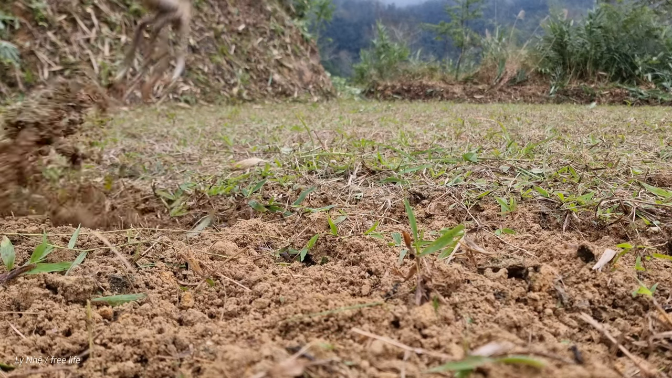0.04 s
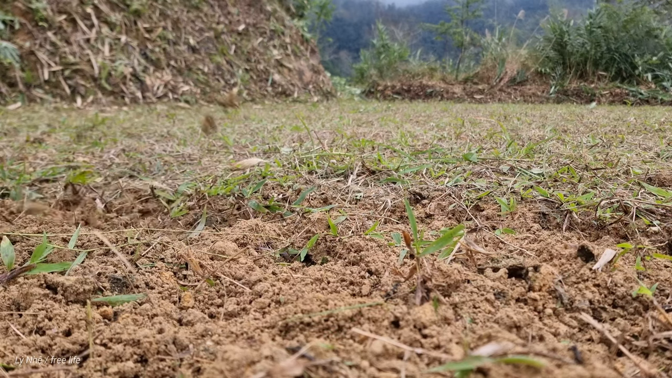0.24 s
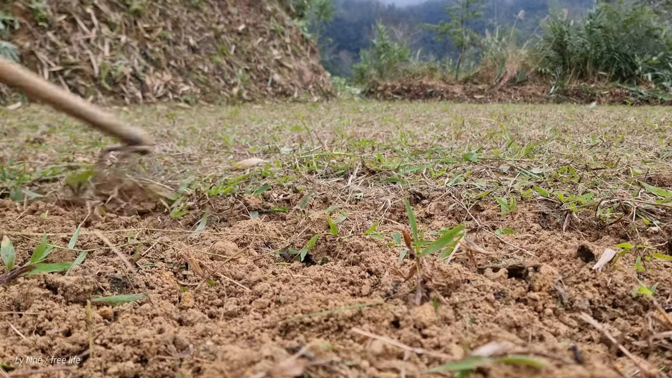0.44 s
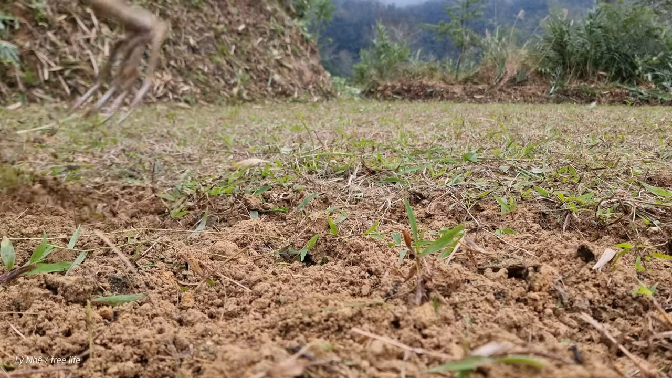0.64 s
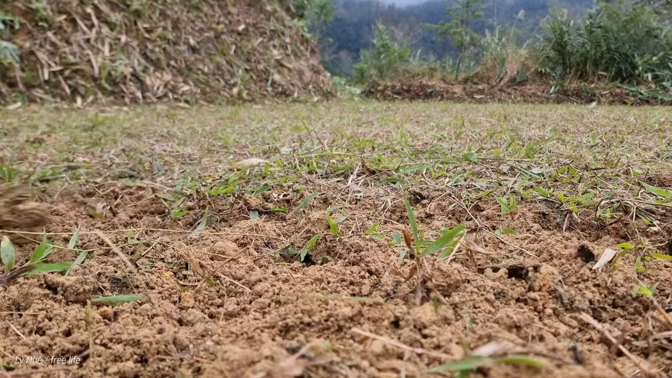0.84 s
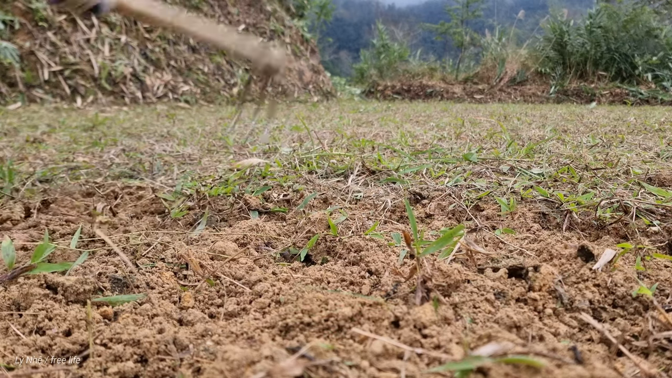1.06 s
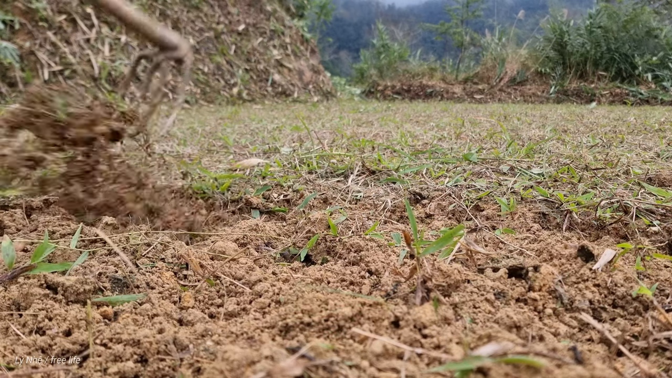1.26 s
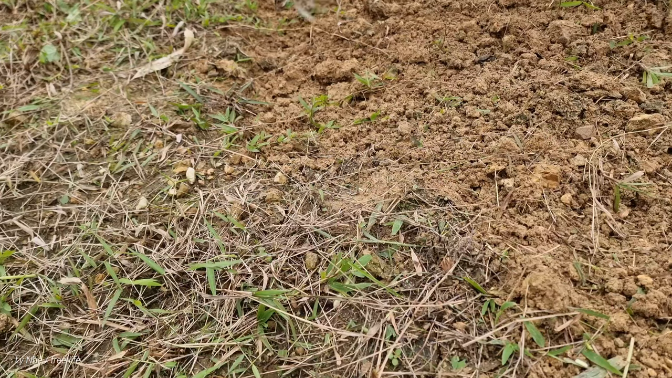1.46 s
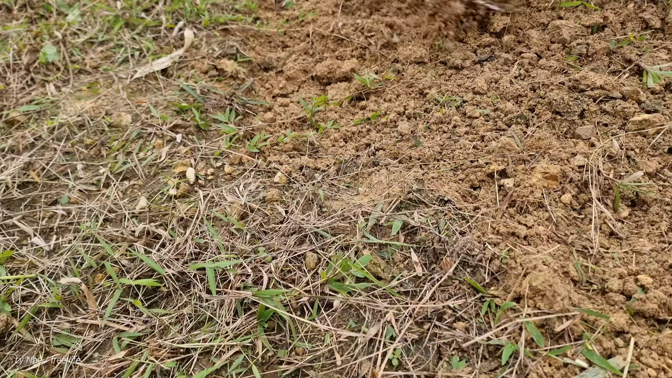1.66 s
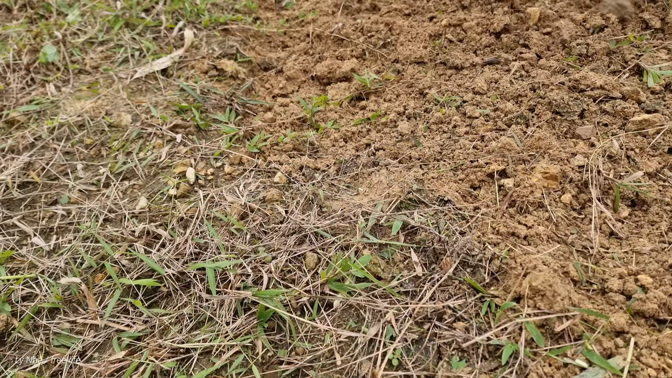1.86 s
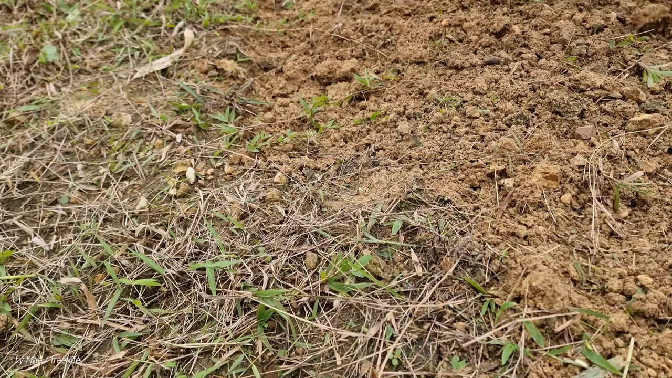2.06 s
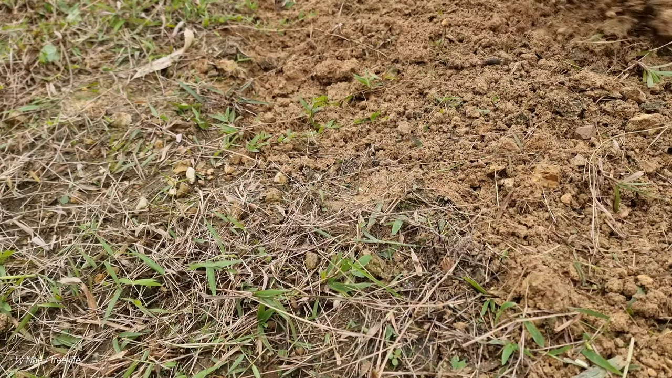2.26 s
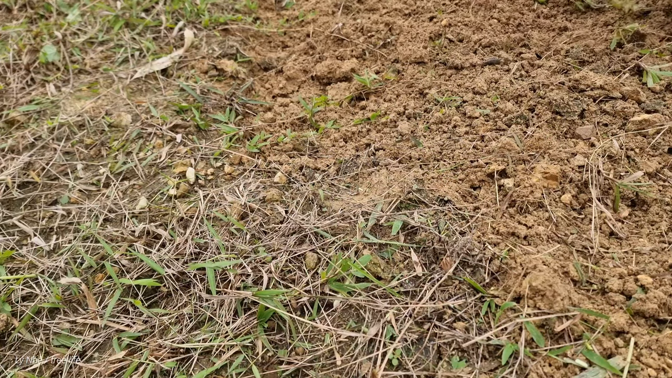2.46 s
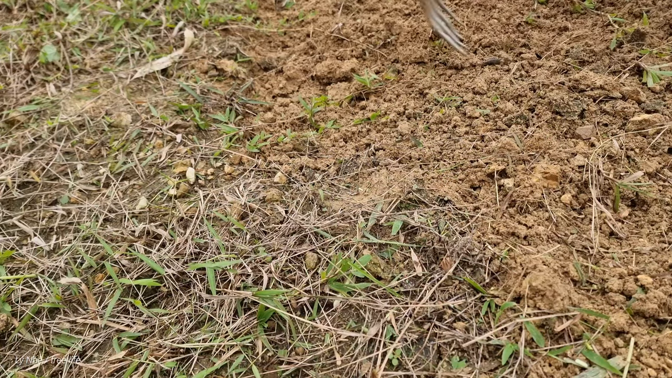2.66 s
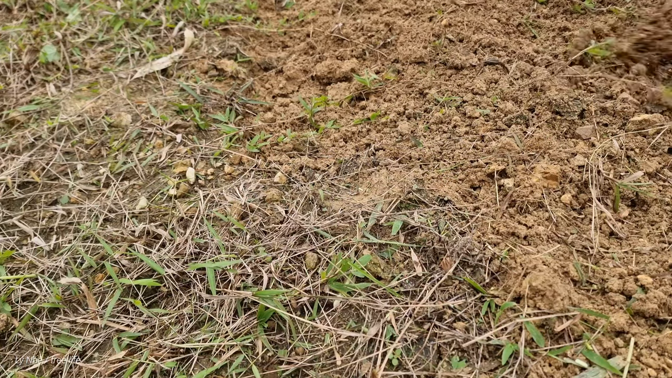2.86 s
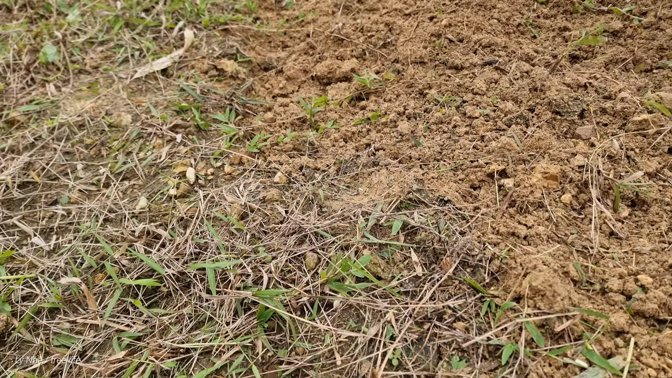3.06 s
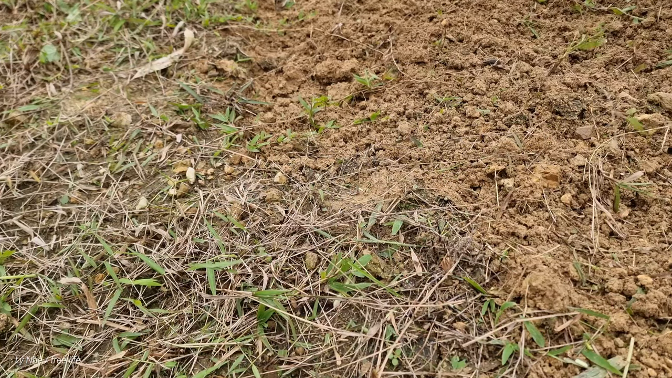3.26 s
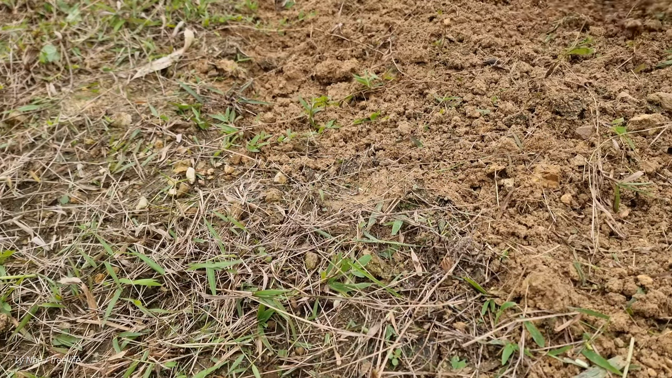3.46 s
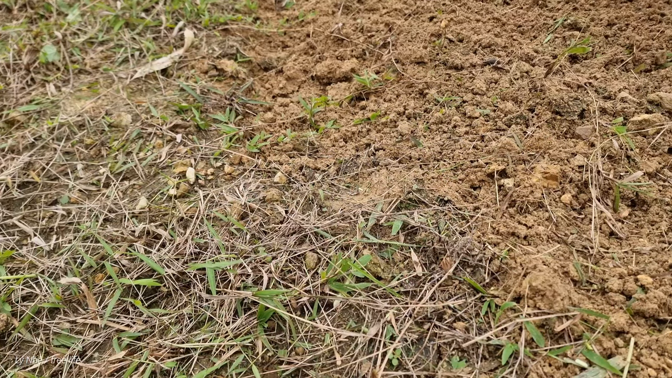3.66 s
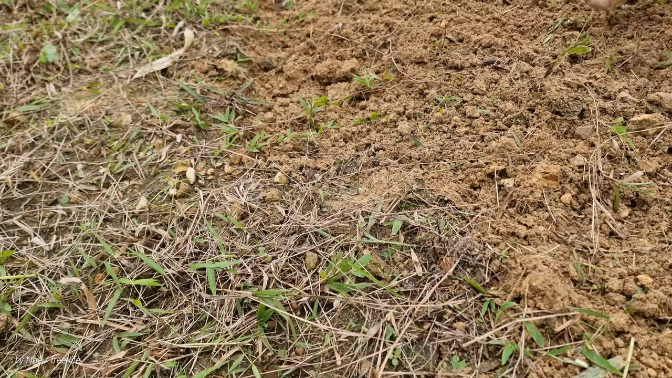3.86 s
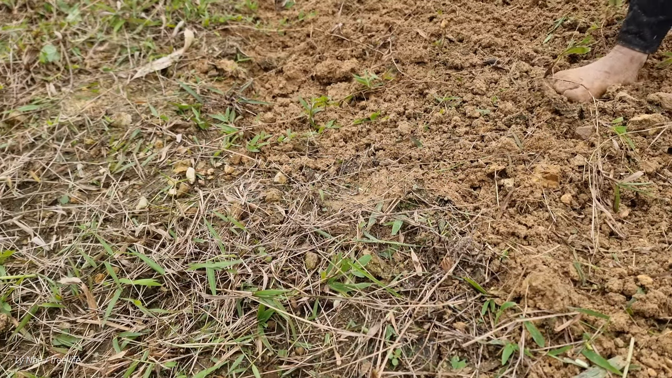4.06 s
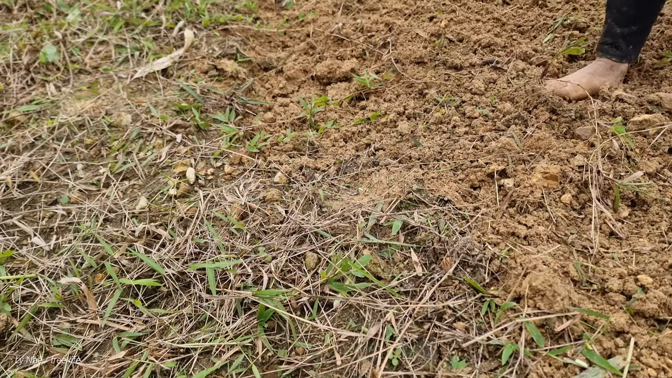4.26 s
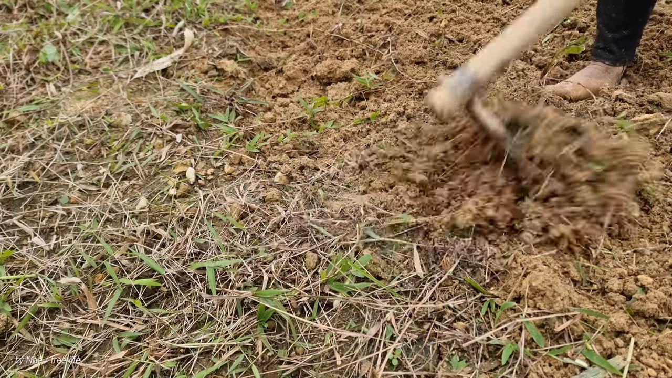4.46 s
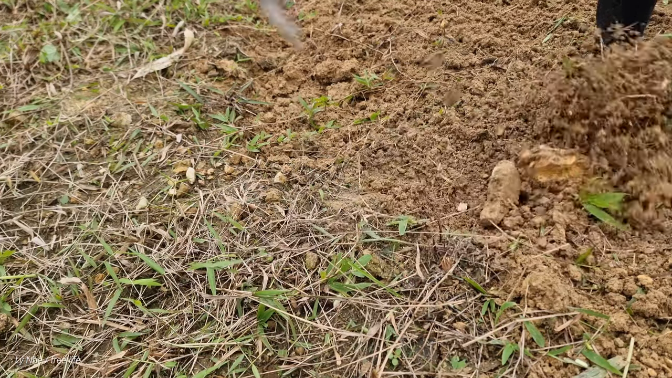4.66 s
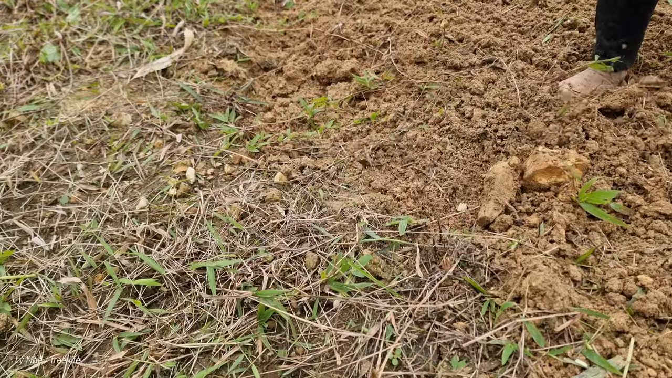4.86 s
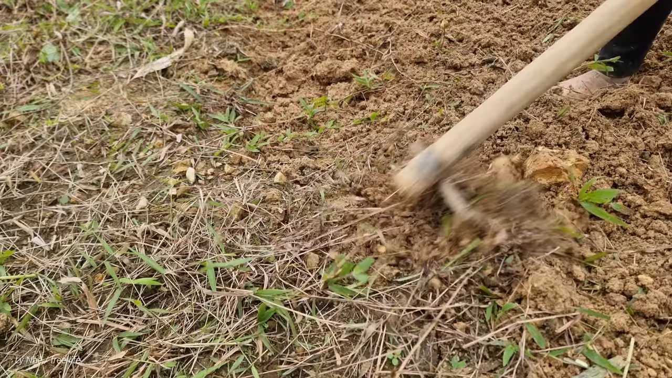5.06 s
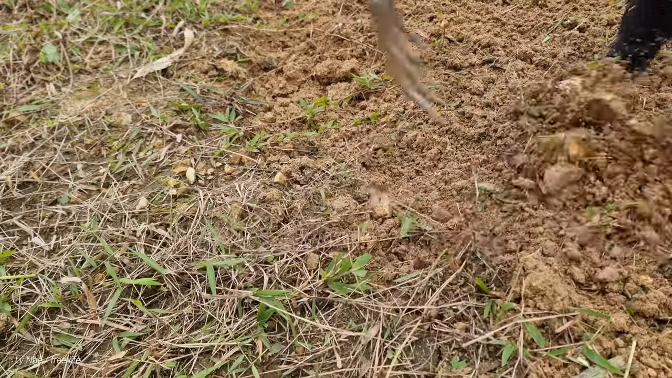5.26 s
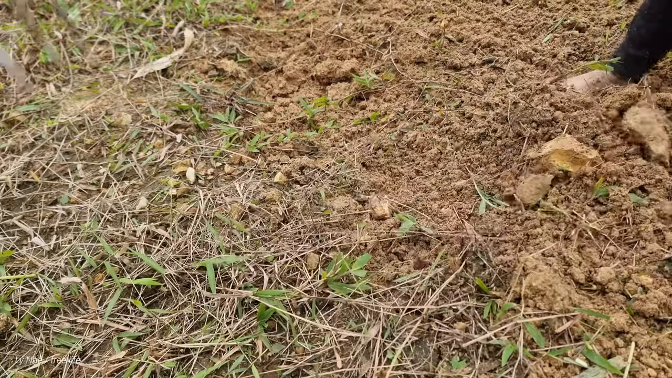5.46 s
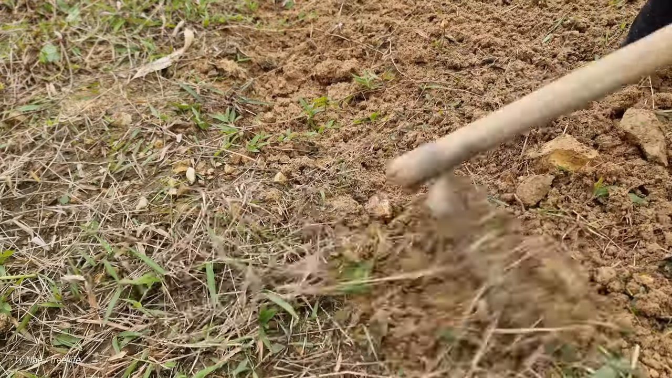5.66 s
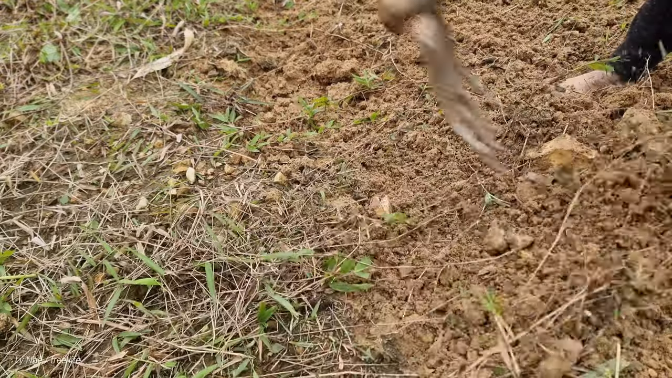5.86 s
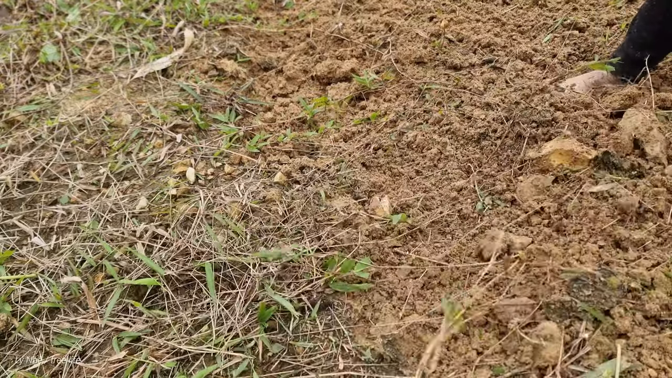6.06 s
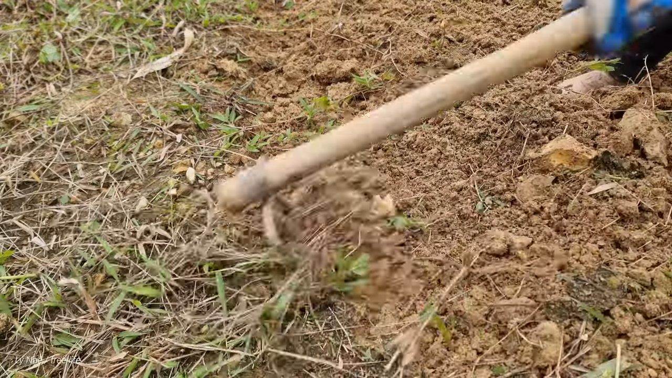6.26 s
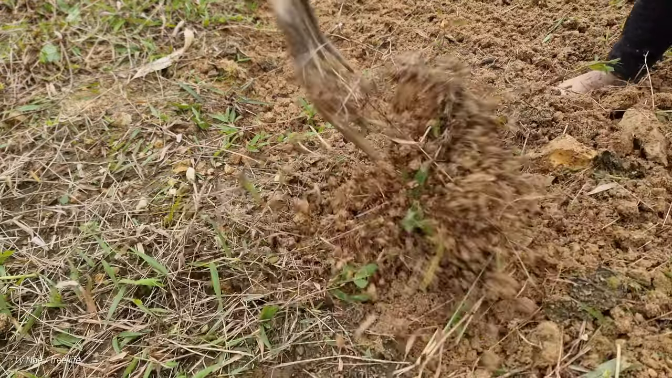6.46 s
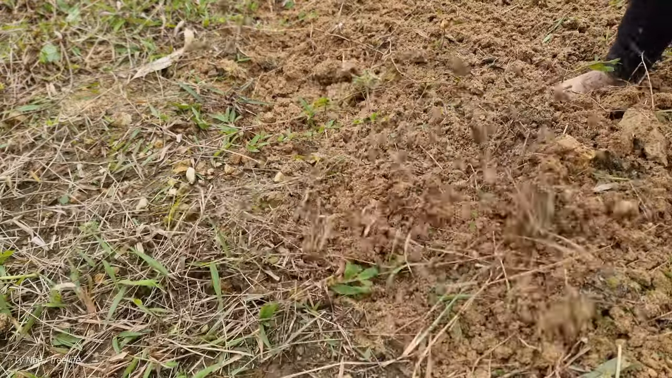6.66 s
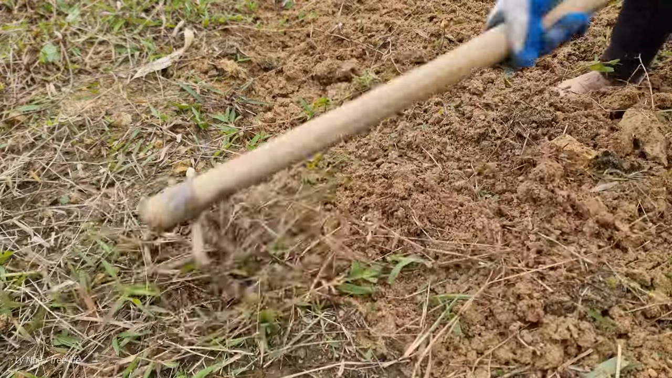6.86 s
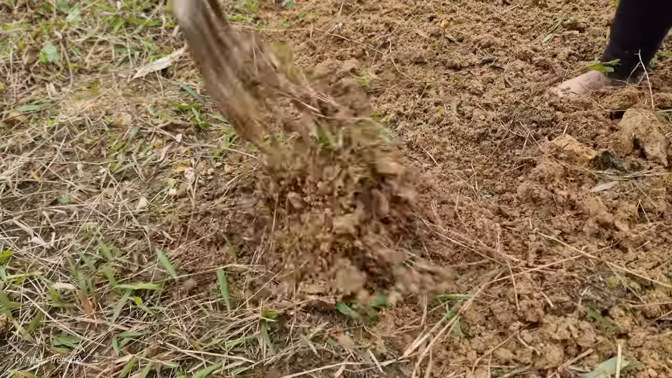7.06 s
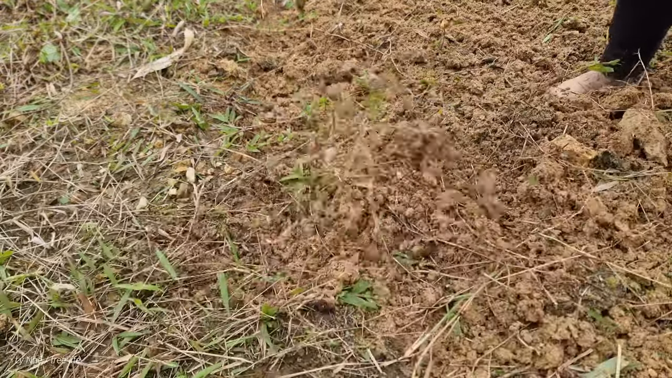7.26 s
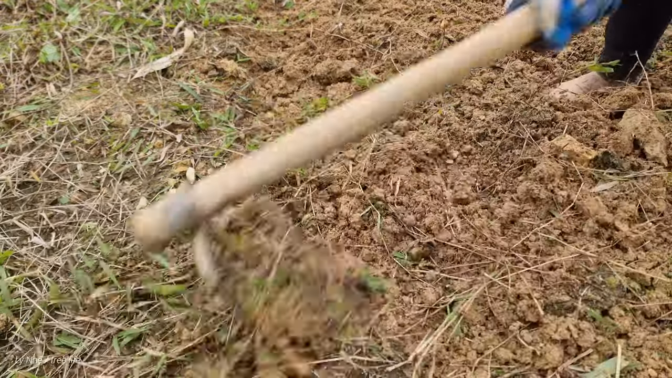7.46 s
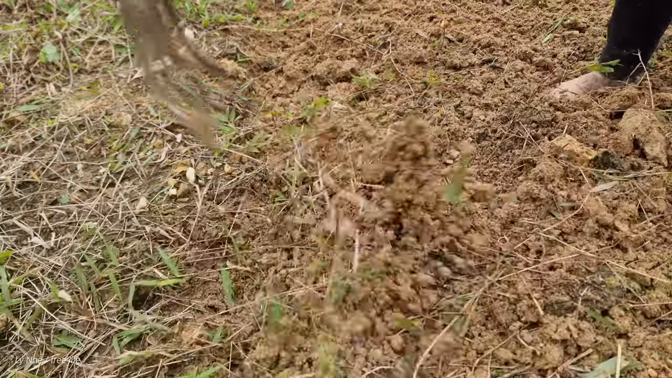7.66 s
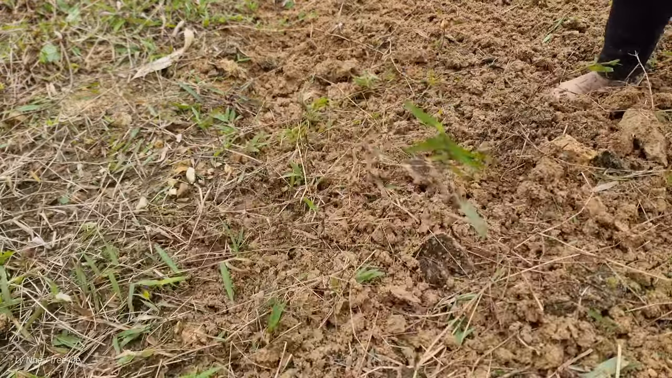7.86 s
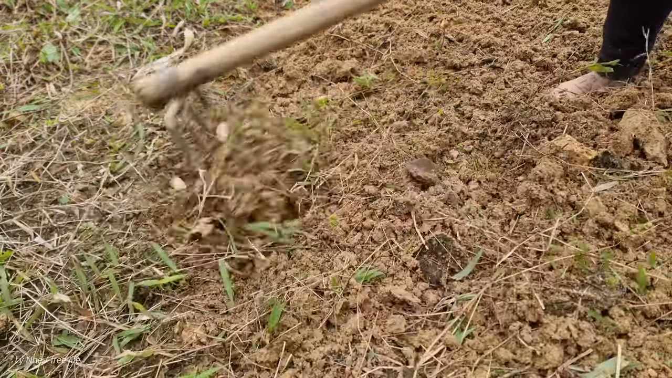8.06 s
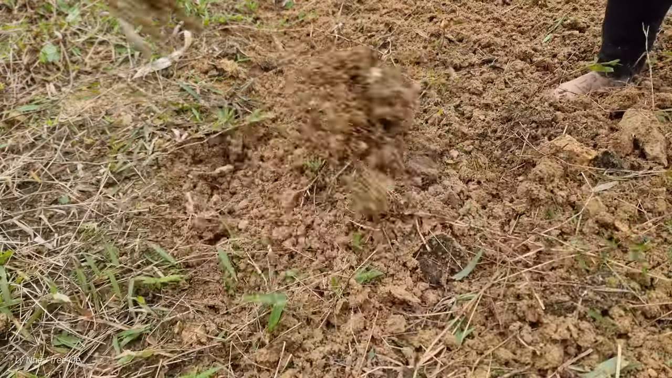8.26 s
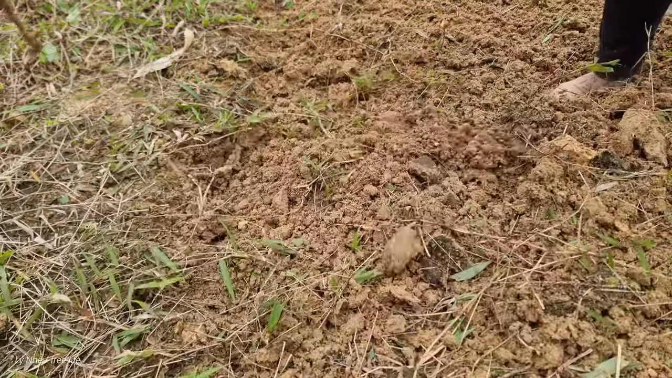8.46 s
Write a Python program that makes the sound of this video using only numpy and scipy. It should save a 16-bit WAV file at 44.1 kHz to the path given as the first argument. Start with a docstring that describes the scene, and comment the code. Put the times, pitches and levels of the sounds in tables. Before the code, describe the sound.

A tined hoe chops dry, stony soil in a steady rhythm, each gritty crunch followed by pattering crumbs, over a faint open-air hush.

```python
"""A quiet open-air hush runs throughout; into it a tined hoe starts chopping dry, stony soil after about 0.5 s.
Each chop is a cluster of contacts, rung as modes of head, tines, cracking crust and ground; struck stones add tones.
Next the loosened soil crunches, as grains through those modes, then patters down; pebbles tick in between.
Just after 5 s the freed tines ring faintly as dying sines. The chops go on to about 8 s, then soil and hush remain.
A pair of spaced microphones hears hoe, stones and soil from changing places, by lag and balance."""
import sys
import numpy as np
from scipy import signal
from scipy.fft import rfft, irfft, next_fast_len
from scipy.io import wavfile

SR = 44100
rng = np.random.default_rng(int(sys.argv[2]) if len(sys.argv) > 2 else 0)


def log_audio(samples):
    """Write samples as a 16-bit WAV file to the path given in sys.argv[1]."""
    # one column per channel
    frames = np.atleast_2d(samples).T
    # limit to full scale, then quantise
    limited = np.clip(frames, -1, 1)
    pcm = np.round(limited * 32767).astype(np.int16)
    wavfile.write(sys.argv[1], SR, pcm)


N = 375291  # length in samples

# contacts of tines, stones and clods: t/s, knock level/dB, tine level/dB, crack level/dB, thud level/dB, t60/s
CONTACTS = [(0.467, -41, -23, -33.5, -26, 0.026), (0.4729, -24.5, -21, -34.5, -44, 0.026),
            (0.4841, -25, -17.5, -22, -36, 0.035), (0.5054, -37, -24, -52, -40, 0.0093),
            (0.5574, -44.5, -39.5, -43.5, -42.5, 0.043), (0.58, -47, -49.5, -60, -39.5, 0.035),
            (1.1332, -30, -28.5, -21.5, -32, 0.029), (1.1471, -32.5, -23.5, -33.5, -54, 0.063),
            (1.1964, -47, -53, -58, -48, 0.011), (1.52, -49, -39.5, -42, -36, 0.024),
            (1.5283, -42, -37.5, -41.5, -42, 0.035), (1.5478, -42, -42, -44.5, -55, 0.036),
            (1.584, -44.5, -57, -50, -58, .02), (1.627, -50, -60, -64, -41, 0.021),
            (1.6417, -48, -47, -48, -40.5, 0.015), (2.102, -46, -53, -55.5, -61.5, 0.06),
            (2.118, -18.5, -13, -23.5, -29, 0.018), (2.1486, -26, -38.5, -32, -39.5, 0.02),
            (2.691, -51.5, -57, -62.5, -56, 0.12), (2.7191, -27.5, -46, -47, -31, 0.026),
            (2.7764, -31, -26, -35.5, -44, 0.027), (3.3243, -45, -42, -51, -67, 0.062),
            (3.344, -48, -45, -47, -60, 0.018), (3.378, -47, -44, -35.5, -50, 0.052),
            (3.42, -45, -54, -52, -48, .02), (3.428, -36.5, -56, -54, -48, 0.011),
            (3.4374, -41, -44, -41.5, -46, 0.045), (3.453, -48.5, -50.5, -49.5, -72, 0.072),
            (3.996, -78, -78.5, -64, -71, 0.049), (4.2641, -61, -87, -93, -51, 0.045),
            (4.3897, -21.5, -12, -25, -19, 0.024), (4.399, -18.5, -23, -35, -27, 0.051),
            (4.412, -32, -27, -27.5, -36, 0.021), (4.5268, -43.5, -51, -46, -35, 0.011),
            (5.0066, -27, -31, -33.5, -43, 0.19), (5.0225, -20, -15.5, -17, -29, 0.023),
            (5.055, -44, -28, -35, -46, .012), (5.0724, -25, -25.5, -28.5, -32, 0.049),
            (5.0955, -27, -26, -34, -48, 0.031), (5.106, -23, -27.5, -34, -30, 0.078),
            (5.1343, -29, -40, -50, -35, 0.078), (5.146, -36, -31, -50, -44, 0.022),
            (5.197, -47.5, -56, -70, -59, .02), (5.612, -37.5, -42, -51.5, -37, 0.032),
            (5.621, -31.5, -24, -34, -36, 0.069), (5.629, -12, -28, -19, -23, 0.02),
            (5.648, -29.5, -30, -36.5, -47, 0.03), (5.671, -24, -23, -32, -41, 0.016),
            (5.703, -36, -38.5, -49, -53, 0.017), (6.2436, -15.5, -15, -17.5, -21.5, 0.013),
            (6.2593, -27, -26.5, -28, -43.5, 0.075), (6.2707, -26, -42.5, -34, -30, 0.029),
            (6.8352, -22, -22, -22.5, -18.5, 0.031), (6.8417, -22, -9.5, -22.5, -13, 0.01),
            (6.8512, -17.5, -10.5, -24.5, -38, 0.019), (6.861, -23.5, -36, -28, -44.5, 0.04),
            (6.9127, -38.5, -59, -61, -35.5, 0.026), (7.008, -50, -46.5, -48, -65.5, 0.026),
            (7.414, -42, -31.5, -37, -38, 0.063), (7.4206, -34, -30, -35, -28.5, 0.041),
            (7.4361, -29.5, -25, -47.5, -38, 0.052), (7.507, -51, -49, -53, -38.5, 0.023),
            (7.9999, -22, -14.5, -16.5, -19.5, 0.018), (8.009, -36, -20.5, -33.5, -51, 0.031),
            (8.0221, -21, -32, -30.5, -20.5, 0.037), (8.032, -30, -32, -43, -30, 0.057),
            (8.07, -51, -58, -62, -36, 0.036), (8.1052, -49, -63, -71, -68.0, 0.03)]
# where the sound comes from, from this moment on (chops and one stone tick): t/s, lag of left behind right/ms,
# treble balance left-right level/dB, head ring over grit level/dB, ground shake over thud level/dB
PLACES = [(0, -0.32, 2, -14.5, -3), (1.099, -0.24, 2, -10.5, 3), (1.449, 0, -2.5, 0, -5.5),
          (2.1, 0.06, -5, -9.5, -5), (2.654, 0.31, -5, -10, -12), (3.301, 0.2, -4.5, -6.5, -5.5),
          (4.35, 0.19, -3, -3, -13.5), (4.701, 0.76, -6.5, -16, -7), (4.98, -0.07, -4, -17, -9.5),
          (5.6, 0.056, -4.5, -7.5, 1.5), (6.2, -0.14, -3, -9.5, -2.5), (6.799, -0.18, -2, -6, -7),
          (7.349, -0.087, -1, -4, 1.5), (7.949, -0.16, -2.5, -8, -12.5)]
# modes of head and handle, tines, cracking crust, thudding ground, shaking ground: f/Hz, width/Hz, relative level/dB
HEAD_MODES = [(844, 140, -10), (1035, 91, -5), (1174, 230, -1), (1452, 250, -1), (1790, 210, -6.5),
              (2196, 510, -8.5)]
TINE_MODES = [(2590, 2100, -5.5), (3090, 560, 0), (3605, 150, -2.5), (4160, 410, -3.5), (4950, 340, -9.5),
              (5260, 310, -7.5)]
CRACK_MODES = [(5700, 920, -2.5), (7510, 620, 4.5), (9070, 700, -5), (10295, 880, 1), (12850, 1200, -2),
               (14300, 1500, -0.5)]
THUD_MODES = [(193, 46, -9), (339, 110, 1), (434, 240, -1), (561, 110, 1), (697, 81, -8.5)]
SHAKE_MODES = [(73, 62, -9), (127, 60, -1), (167, 52, -3.5)]
# stones and hard clods struck squarely: t/s, f/Hz, level/dB before the swell, t60/s
STONES = [(0.4837, 500, -33.5, 0.076), (0.497, 127.5, -32.5, .08), (0.582, 591, -48, 0.091),
          (1.138, 351, -35, 0.074), (1.173, 140, -37, 0.056), (1.225, 142, -43, 0.079),
          (2.117, 2024, -11, 0.021), (2.1185, 680, -20.5, 0.043), (2.122, 1165, -18, 0.038),
          (2.7764, 4260, -11.5, .015), (3.3242, 1410, -30, .03), (3.326, 3700, -29, 0.026),
          (3.442, 795, -33, 0.024), (4.392, 210, -23.5, 0.062), (4.394, 1310, -18, .04),
          (4.396, 1056, -17, 0.062), (5.006, 1274, -24.5, .06), (5.0232, 1280, -11, 0.025),
          (5.107, 575, -20, 0.079), (5.629, 1332, -4.5, 0.023), (5.629, 277, -12, 0.024),
          (5.671, 1370, -15, 0.021), (5.672, 567, -25.5, 0.026)]
# single pebbles ticking: t/s, crack level/dB, change of level/dB per step down to the duller modes
PEBBLES = [(0.727, -61, -0.5), (0.873, -59, -8), (0.965, -53, -13.5), (1.381, -51.5, -10.5),
           (2.3123, -52, -1.5), (2.329, -58, -0.5), (2.376, -60.5, 4), (2.392, -57, 1), (2.599, -44.5, -17),
           (2.679, -62, -1), (2.826, -39, -4.5), (3.095, -61, 0), (3.111, -62, -2.5), (3.247, -69.5, 8.5),
           (3.593, -54, -7.5), (4.116, -61, -5), (4.1867, -49.5, -12), (4.494, -48.5, 4), (4.6, -57, -5),
           (4.62, -50, -6), (4.7752, -22.5, -18), (5.2444, -46, -1), (5.2512, -38, -25), (5.8427, -49.5, 0),
           (6.3985, -44.5, -3), (6.649, -47, -10.5), (6.715, -46.5, -10), (6.755, -50.5, -12),
           (7.012, -46.5, -1), (7.034, -51, -7), (7.197, -50.5, -1.5), (7.2558, -46, -16.5), (7.29, -66, 7),
           (7.314, -51, -9), (7.3714, -42.5, -5), (8.169, -53.5, -0.5)]
# tines ringing free: f/Hz, starting level/dB, t60/s
FREE_RING = [(368, -54, 0.54), (1080, -48, 0.15), (1660, -57.5, 0.74), (3117, -54, 0.27)]
# soil breaking up under each chop: rough t/s, grit level/dB, clod level/dB, hold/s, t60/s, following patter level/dB
CRUNCHES = [(0.469, -34, -40, 0.031, 0.14, -78.5), (1.128, -43.5, -45.5, 0.024, 0.25, -74.5),
            (1.52, -56.5, -59.5, 0.018, 0.45, -64.5), (2.118, -40.5, -50, 0.041, 0.13, -72.5),
            (2.722, -46.5, -63.5, 0.084, 0.13, -72.5), (3.321, -55, -65, .12, 0.11, -65.5),
            (4.39, -33, -36, 0.012, 0.17, -65), (5.001, -33, -36, 0.024, 0.13, -69.5),
            (5.071, -42, -41, 0.048, 0.1, -63.5), (5.61, -36, -39, 0.043, 0.18, -61.5),
            (6.237, -33.5, -36, 0.029, 0.042, -59.5), (6.831, -37.5, -36.5, 0.019, 0.14, -57.5),
            (7.421, -35.5, -40.5, 0.015, 0.14, -59.5), (7.995, -34.5, -48.5, 0.033, 0.059, -67)]
# handfuls of thrown or kicked soil landing: t/s of the peak, grit level/dB, clod level/dB, t60/s
SHOWERS = [(0.01, -73.5, -70.5, 0.25), (0.239, -73.5, -79, 0.2), (0.804, -67.5, -72.5, 0.34),
           (1.505, -56.5, -60, 0.29), (1.864, -72, -73.5, 0.42), (2.38, -63, -72.5, 1),
           (2.58, -70.5, -80, 0.52), (2.923, -64, -85, 0.57), (3.105, -65.5, -88, 0.27),
           (3.8, -72, -78, 0.42), (4.064, -63.5, -77.5, 0.084), (4.631, -68.5, -84, 0.59),
           (4.74, -66, -67, 0.63), (4.969, -67.5, -79.5, 0.98), (5.344, -67, -88, 0.41),
           (5.95, -65, -69, 0.26), (6.649, -62, -86.5, 0.44), (6.8, -66, -76.5, .7),
           (7.017, -51.5, -86, 0.13), (7.228, -65.5, -83, 1), (8.371, -68.5, -76.5, 0.55)]
# spectrum of rubbing crumbs: f/Hz, relative level/dB
GRIT_SPECTRUM = [(1180, -42), (1900, -6.5), (2400, -7), (3260, -5.5), (4690, -4.5), (5160, -3.5),
                 (5830, -7), (6640, -5), (8630, -10), (10800, -5.5), (14900, -8.5), (16000, -11.5)]
# edges of the ranges in which the crumb sizes sound: f/Hz
GRIT_EDGES_HZ = [1200, 3300, 5500, 9000, 18000]
# sound reaching one side only, against the shared sound: f/Hz, relative level/dB
SCATTER = [(100, -15), (500, -9), (1500, 2.5), (5000, 5.5), (15000, 4.5)]
# spectrum of the hush common to both sides: f/Hz, relative level/dB
HUSH_SPECTRUM = [(15, -35), (25, -17.5), (53, -1.5), (130, 4), (354, -3.5), (1700, -8.5), (7310, -8.5),
                 (8360, -17), (12900, -11), (14800, -10), (16000, -19)]
# likeness of the hush on both sides: f/Hz, left-right correlation
HUSH_LIKENESS = [(60, 0.85), (240, 0.7), (950, -0.34), (3770, 0.23), (15000, -0.57)]
# dip in the low treble, as from sound reflected off the ground: f/Hz, width/Hz, depth (0-1)
GROUND_DIP = (2400, 600, .55)

MODE_SPREAD_DB = 5     # chance in the strength of each mode
SNAP = 17.4            # first click of a contact, against slips of rms 1
SHAKE_LAG_S = 0.014    # the ground gives way after the blow
SHAKE_T60_SHARE = 0.8  # fall of the ground shake against that of the grit
PEBBLE_T60_S = 0.0074
STONE_RISE_CYCLES = 0.29
FREE_RING_S, RING_LASTS_S, RING_DAMPED_T60_S = 5.155, 0.18, 0.15  # then the swing damps it
CRUNCH_RISE_S = 0.004
SLUMP_DB, SLUMP_T60_S = -20.5, 0.35  # the torn soil slumps back, under the crunch
PATTER_T60_S, PATTER_CLOD_DB = 1.5, -17.5  # crumbs keep falling; clods among them, under the grit
LOOSE_HEAD_DB = -5.5   # pattering crumbs ring the head less than crumbs under the tines
TINE_GRIT_DB = 1.0     # crumbs ring the tines too, over the head
CLOD_T60_SHARE, CLOD_REST_DB, GRIT_REST_DB = 0.83, -82, -88
SHOWER_RISE_SHARE = 0.33  # rise time over fall time
HUSH_DB = -67
SHADOW_HZ = 600        # half of the balance is reached here
LOW_CUT_HZ, CEILING, CUTOFF_HZ = 45, 0.95, 16700


def contacts():
    """A snap and a dying burst of slips ring the parts, each mode with a new strength at every contact."""
    size, room = 6144, 32  # samples; the room lets one side come early
    hz = np.fft.rfftfreq(size, 1 / SR)
    t = np.arange(size) / SR
    tables = (HEAD_MODES, TINE_MODES, CRACK_MODES, THUD_MODES, SHAKE_MODES)
    parts = [modes(table, hz) for table in tables]
    own_share = from_db(at_hz(SCATTER, hz))
    shake_delay = np.exp(-2j * np.pi * hz * SHAKE_LAG_S)
    out = np.zeros((2, N + size))
    for s, *levels_db, t60 in all_contacts():
        lag, balance_db, _, shake_db = place(s)
        levels_db = levels_db + [levels_db[-1] + shake_db]
        strengths = from_db(MODE_SPREAD_DB * rng.standard_normal((5, 6)))
        knock, tine, crack, thud, shake = (
            from_db(db) * rms_one(strength[:len(part)] @ part)
            for db, strength, part in zip(levels_db, strengths, parts))

        # row 0 is heard on both sides, rows 1 and 2 on one side each
        slips = grains((3, size), per_s=3500, spread_db=3.5, hiss=0.4) * (t < 0.1)
        slips[0, 16] += SNAP
        fall = from_db(-60 * t / max(t60, 0.004))
        sharp = rfft(slips * (1 - np.exp(-t / 0.00057)) * fall)
        heavy = rfft(slips * (1 - np.exp(-t / 0.0051)) * fall)  # the ground yields slowly
        shared, *own = (knock + tine + crack) * sharp + (thud + shake * shake_delay) * heavy

        delays = np.array([[lag / 2], [-lag / 2]]) + room / SR
        sides = np.exp(-2j * np.pi * hz * delays) * shadow(hz, [[balance_db], [-balance_db]])
        at = round(s * SR) - room
        out[:, at:at + size] += irfft(sides * (shared + own_share * own), size)
    return out[:, :N]


def all_contacts():
    """Hoe contacts and pebbles as rows of one kind; a pebble's level changes step by step from crack to knock."""
    ticks = [(s, db + 2 * step_db, db + step_db, db, db + 2 * step_db - 7, PEBBLE_T60_S)
             for s, db, step_db in PEBBLES]
    return CONTACTS + ticks


def stones():
    """Each stone or hard clod rings as one dying tone at its own pitch, swelling within about a cycle."""
    room = 0.001  # s, lets one side come early
    t = np.arange(N // 40) / SR
    out = np.zeros((2, N + N // 40))
    for s, hz, db, t60 in STONES:
        lag, balance_db, *_ = place(s)
        at = round((s - room) * SR)
        for side, sign in enumerate((1, -1)):
            late = np.maximum(t - room - sign * lag / 2, 0)
            swell = 1 - np.exp(-late * hz / STONE_RISE_CYCLES)
            tone = swell * from_db(db - 60 * late / t60) * np.sin(2 * np.pi * hz * late)
            out[side, at:at + len(t)] += shadow(hz, sign * balance_db) * tone
    return out[:, :N]


def free_ring():
    """Once the tines come clear after a stone they ring on faintly as dying sines, until damped."""
    t = np.maximum(np.arange(N) / SR - FREE_RING_S, 0)
    damped_db = -60 * np.maximum(t - RING_LASTS_S, 0) / RING_DAMPED_T60_S
    return sum(from_db(db - 60 * t / t60 + damped_db) * np.sin(2 * np.pi * hz * t)
               for hz, db, t60 in FREE_RING)


def soil():
    """Crumbs rub and patter in uneven clumps: grit hisses and rings the hoe, clods thump and shake the ground."""
    t = np.arange(N) / SR
    lag, balance_db, head_db, shake_db = place(t)
    grit_db, rung_db, clod_db, shaken_db = soil_levels(t)
    grit_db = grit_db + 2.2 * drift(43)
    clod_db = clod_db + 3.1 * drift(24)
    head_db = rung_db + head_db
    crumbs = [grains((3, N), per_s=1000, spread_db=1.0, hiss=0.29) for _ in range(2)]
    clods = grains((3, N), per_s=280, spread_db=3.5, hiss=0.56)

    # each crumb size sounds in its own range, in its own clumps
    gritty = [coloured(c, lambda hz: from_db(at_hz(GRIT_SPECTRUM, hz))) for c in crumbs]
    grit = 0
    for k, edges in enumerate(zip(GRIT_EDGES_HZ, GRIT_EDGES_HZ[1:])):
        grit = grit + from_db(3.0 * drift(36)) * band(gritty[k % 2], edges)

    head = coloured(crumbs[1], lambda hz: modes(HEAD_MODES, hz).sum(0))
    tines = coloured(crumbs[0], lambda hz: modes(TINE_MODES[1:], hz).sum(0))
    thump = coloured(clods, lambda hz: modes(THUD_MODES, hz).sum(0))
    shake = coloured(clods, lambda hz: modes(SHAKE_MODES, hz).sum(0))
    # signal, level in dB, Hz at which scatter and shadow are read
    layers = [(grit, grit_db, 6000),
              (head, head_db + 4.0 * drift(35), 1300),
              (tines, head_db + TINE_GRIT_DB + 4.8 * drift(35), 3600),
              (thump, clod_db, 400),
              (shake, shaken_db - 4.5 + shake_db + 3.0 * drift(5), 120)]
    out = np.zeros((2, N))
    for (shared, *own), level_db, centre_hz in layers:
        own_share = from_db(at_hz(SCATTER, centre_hz))
        for side, sign in enumerate((1, -1)):
            heard = np.interp(t - sign * lag / 2, t, shared) + own_share * own[side]
            out[side] += from_db(level_db) * shadow(centre_hz, sign * balance_db) * heard
    return out


def soil_levels(t):
    """Grit, head, clod and shake dB: crunches rise, hold, then die as crunch, slump and patter; showers swell."""
    grid = np.arange(0, N / SR + 0.01, 0.001)  # s, in steps of 1 ms
    loose = from_db([[0], [LOOSE_HEAD_DB], [PATTER_CLOD_DB], [PATTER_CLOD_DB]])
    shares = np.array([[1], [1], [CLOD_T60_SHARE], [SHAKE_T60_SHARE]])
    power = from_db([[GRIT_REST_DB]] * 2 + [[CLOD_REST_DB]] * 2) ** 2
    for s, grit_db, clod_db, hold, t60, patter_db in CRUNCHES:
        s = min((row[0] for row in CONTACTS), key=lambda at: abs(at - s))  # sets in with the nearest contact
        rise = np.clip((grid - s) / CRUNCH_RISE_S, 0, 1) ** 2
        after = -60 * np.maximum(grid - s - hold, 0)
        crunch = from_db(after / (t60 * shares)) + from_db(SLUMP_DB + after / SLUMP_T60_S)
        patter = loose * from_db(patter_db + after / PATTER_T60_S)
        levels = from_db([[grit_db]] * 2 + [[clod_db]] * 2)
        power = power + rise * (levels * crunch + patter) ** 2
    for s, grit_db, clod_db, t60 in SHOWERS:
        swell_db = -60 * np.maximum((s - grid) / SHOWER_RISE_SHARE, grid - s) / t60
        power = power + from_db(swell_db + [[grit_db], [grit_db], [clod_db], [clod_db]]) ** 2
    lags = (0, 0, 0, SHAKE_LAG_S)
    return [np.interp(t - lag, grid, 10 * np.log10(p)) for p, lag in zip(power, lags)]


def hush(patchy_db):
    """Half-octave bands of open-air noise, each wavering by itself, most alike on both sides in the bass."""
    out = 0
    edges = 22 * 2 ** np.arange(0, 10, 0.5)
    white = rng.standard_normal((2, 2, N))
    for k, (low, high) in enumerate(zip(edges, edges[1:])):
        mid, side = band(white[k % 2], [low, high])
        hz = np.sqrt(low * high)
        alike = np.clip(at_hz(HUSH_LIKENESS, hz), -0.95, 0.99)
        gain = from_db(at_hz(HUSH_SPECTRUM, hz) + patchy_db * drift(14)) / np.sqrt(1 + alike)
        out = out + gain * (np.sqrt(1 + alike) * mid + np.sqrt(1 - alike) * side * [[1], [-1]])
    return rms_one(out)


def place(seconds):
    """Lag (s), balance, head and shake levels (dB) of the place sounding now."""
    s, lag_ms, *levels_db = np.transpose(PLACES)
    row = np.searchsorted(s, seconds, "right") - 1
    return lag_ms[row] / 1000, *(db[row] for db in levels_db)


def shadow(hz, balance_db):
    """Gain of one side: only short waves are shaded on the far side."""
    return from_db(np.multiply(balance_db, hz / (hz + SHADOW_HZ)) / 2)


def modes(table, hz):
    """Causal resonance of every mode, neighbours in opposite sign."""
    f0, width, level_db = np.array(table).T[:, :, None]
    signs = (-1.) ** np.arange(len(table))[:, None]
    damping = 1j * hz * width
    return signs * from_db(level_db) * damping / (f0 ** 2 - hz ** 2 + damping)


def grains(size, per_s, spread_db, hiss):
    """Random clicks of uneven size over a share of smooth hiss; rms 1."""
    sizes = from_db(spread_db * np.minimum(rng.exponential(1, size), 4)) * rng.choice([-1, 1], size)
    clicks = rms_one(sizes * (rng.random(size) < per_s / SR))
    return rms_one(clicks + hiss * rng.standard_normal(size))


def drift(rate):
    """Slow chance: noise at every 40th sample through a double one-pole low-pass at rate Hz; rms 1."""
    r = np.exp(-2 * np.pi * rate * 40 / SR)
    noise = rng.standard_normal(N // 40 + 2002)
    slow = signal.lfilter([1], [1, -2 * r, r * r], noise)[2000:]  # the filter has settled
    return np.interp(np.arange(N) / 40, np.arange(len(slow)), rms_one(slow))


def coloured(x, response):
    """Passed through a response given as a function of Hz; rms 1."""
    size = next_fast_len(N)
    spectrum = rfft(x, size) * response(np.fft.rfftfreq(size, 1 / SR))
    return rms_one(irfft(spectrum, size)[..., :N])


def band(x, edges):
    """Band-passed between two edges in Hz."""
    return signal.sosfilt(signal.butter(2, edges, "band", fs=SR, output="sos"), x)


def at_hz(points, hz):
    """A spectrum read on a log-frequency axis."""
    point_hz, values = np.array(points).T
    return np.interp(np.log(hz + 1), np.log(point_hz), values)


def from_db(db):
    """Gain of a level in dB."""
    return 10 ** (np.asarray(db) / 20)


def rms_one(x):
    """Scaled to rms 1."""
    return x / np.sqrt(np.mean(np.abs(x) ** 2) + 1e-20)


def scene():
    """Hoe and pebbles, stones, free tines, soil and air."""
    return contacts() + stones() + free_ring() + soil() + from_db(HUSH_DB) * hush(patchy_db=0.5)


def record(dry):
    """The deep bass is lost, a ground reflection hollows the low treble; peaks are rounded, the top is cut."""
    hz, width, depth = GROUND_DIP
    x = dry - depth * signal.lfilter(*signal.iirpeak(hz, hz / width, fs=SR), dry)
    x = signal.sosfilt(signal.butter(2, LOW_CUT_HZ, "high", fs=SR, output="sos"), x)
    x = CEILING * np.tanh(x / CEILING)
    return signal.sosfilt(signal.cheby2(16, 80, CUTOFF_HZ, fs=SR, output="sos"), x)  # 80 dB down at the cutoff


dry = scene()
out = record(dry)
log_audio(out)
```